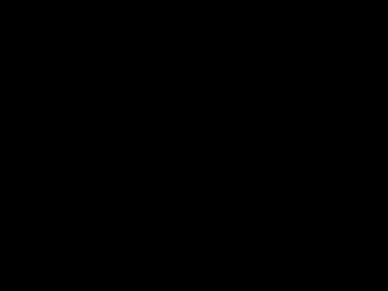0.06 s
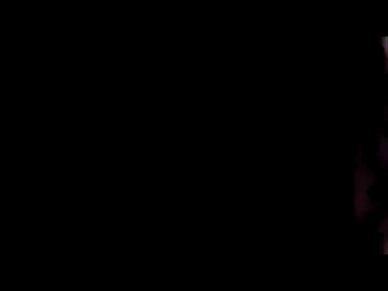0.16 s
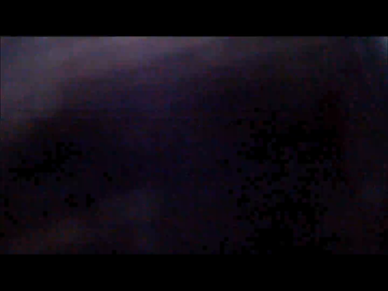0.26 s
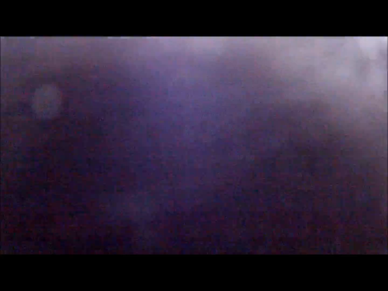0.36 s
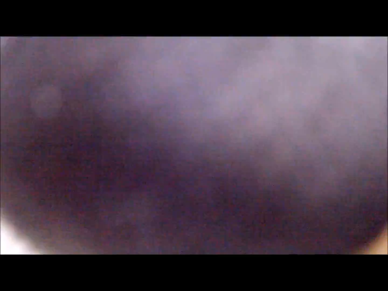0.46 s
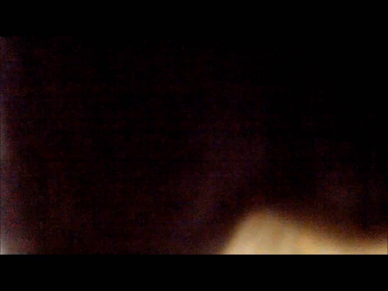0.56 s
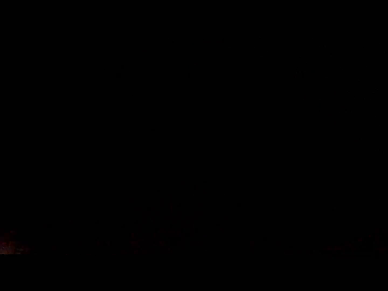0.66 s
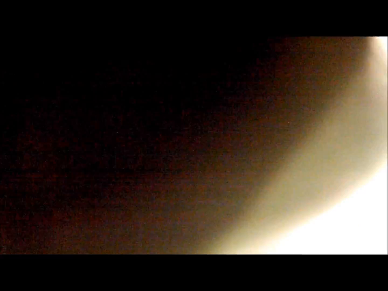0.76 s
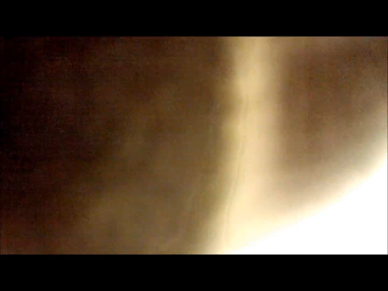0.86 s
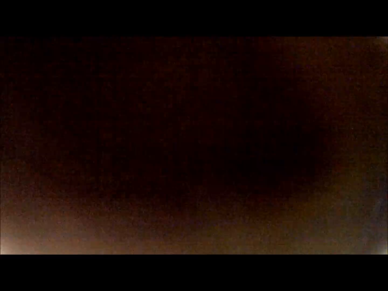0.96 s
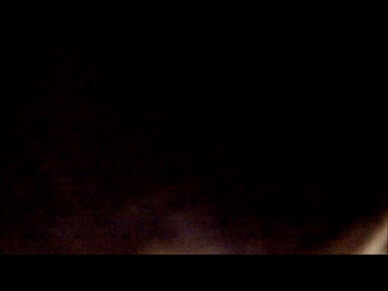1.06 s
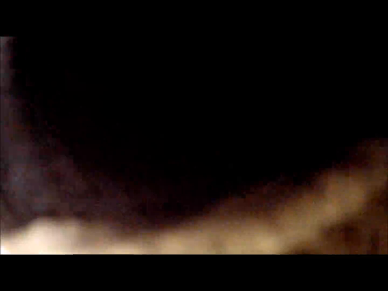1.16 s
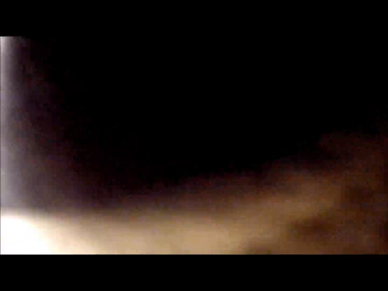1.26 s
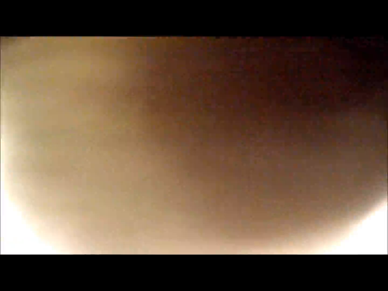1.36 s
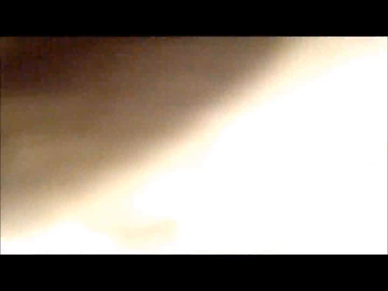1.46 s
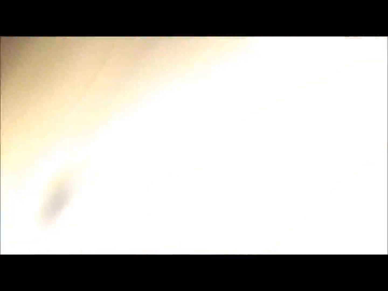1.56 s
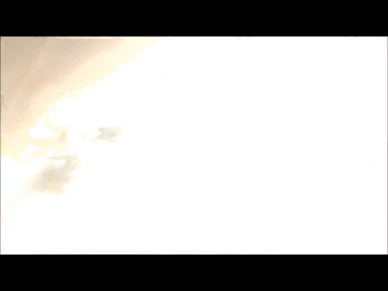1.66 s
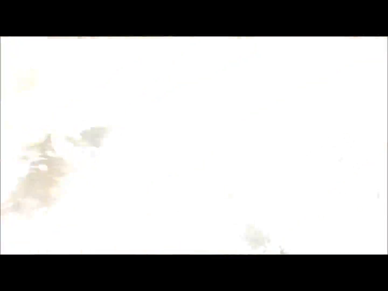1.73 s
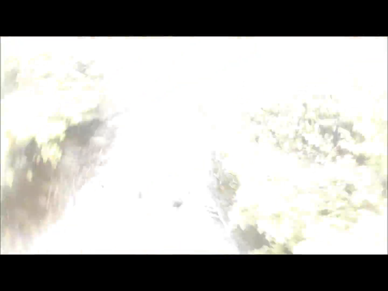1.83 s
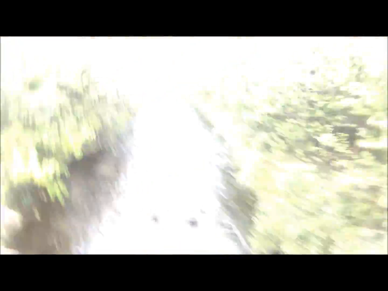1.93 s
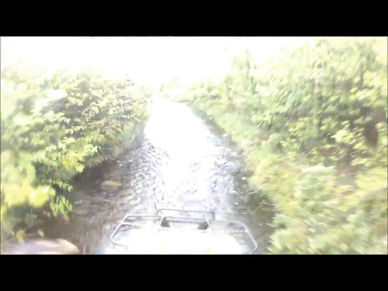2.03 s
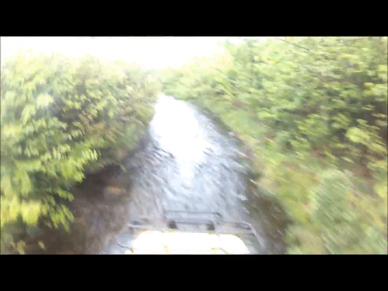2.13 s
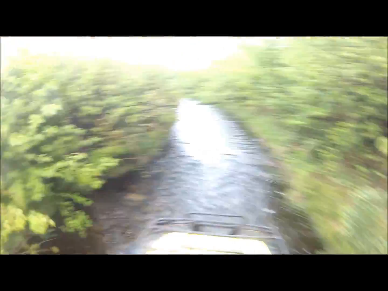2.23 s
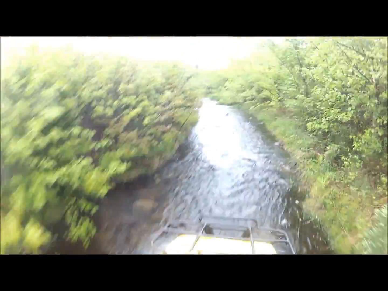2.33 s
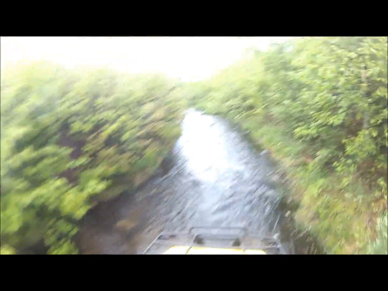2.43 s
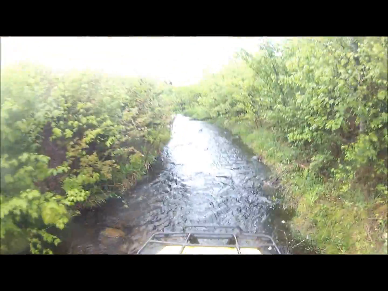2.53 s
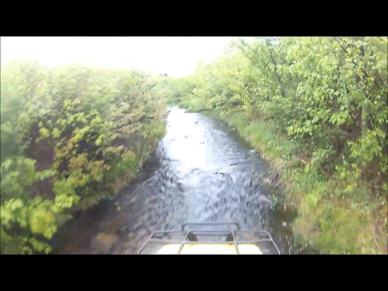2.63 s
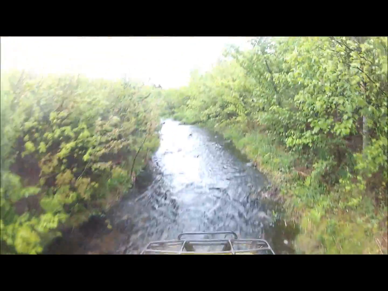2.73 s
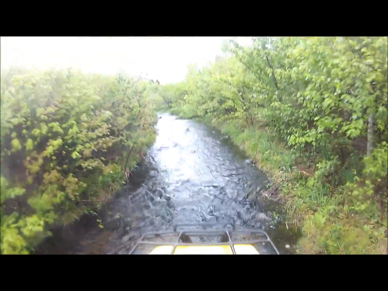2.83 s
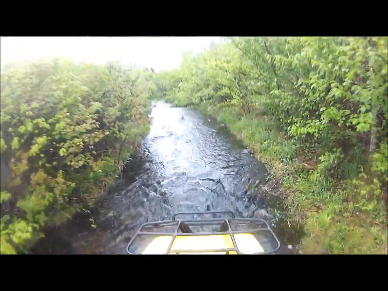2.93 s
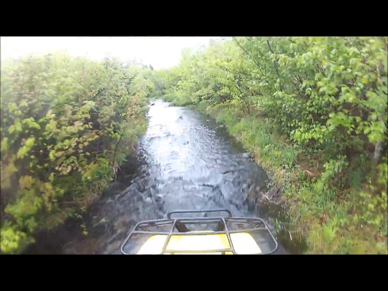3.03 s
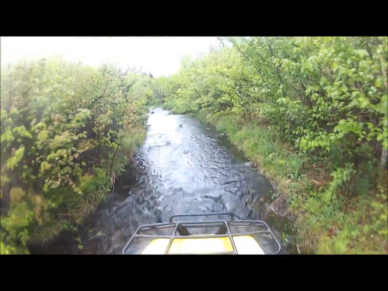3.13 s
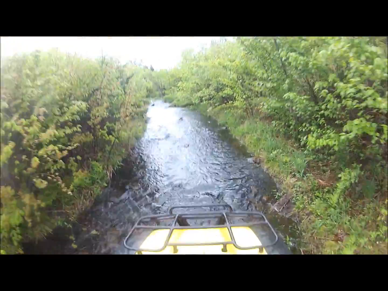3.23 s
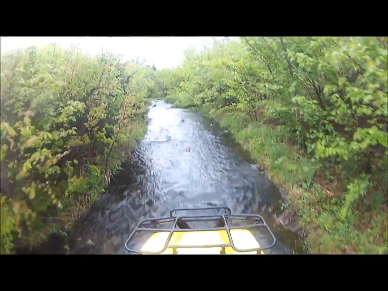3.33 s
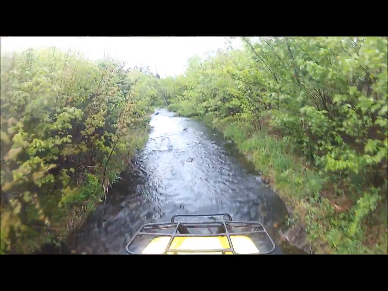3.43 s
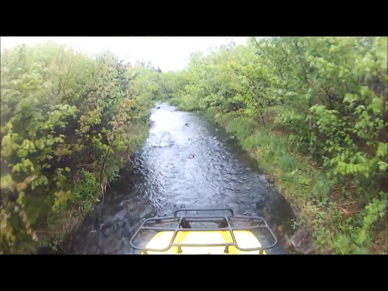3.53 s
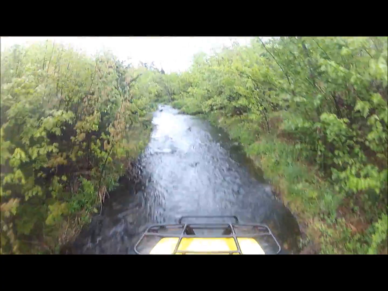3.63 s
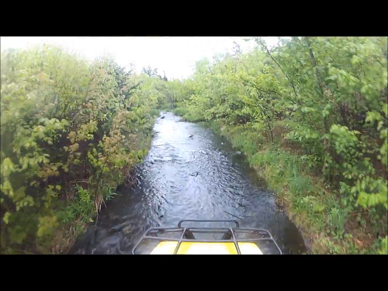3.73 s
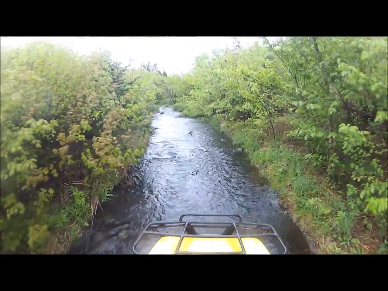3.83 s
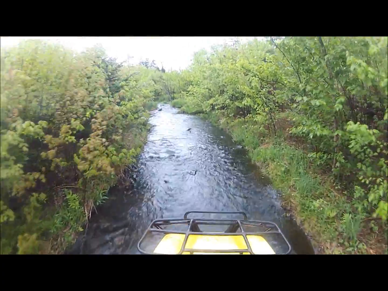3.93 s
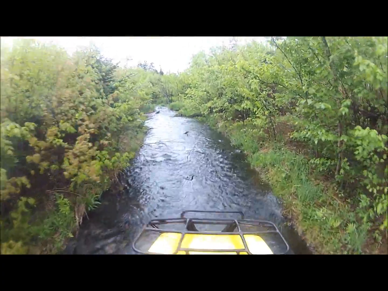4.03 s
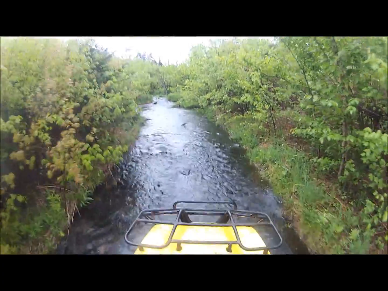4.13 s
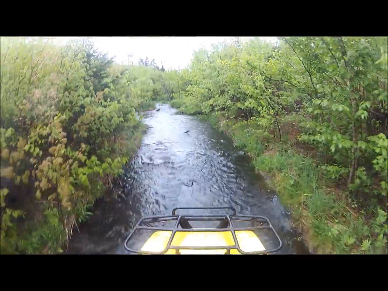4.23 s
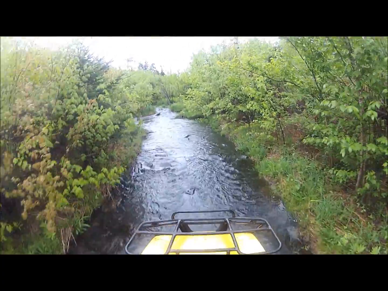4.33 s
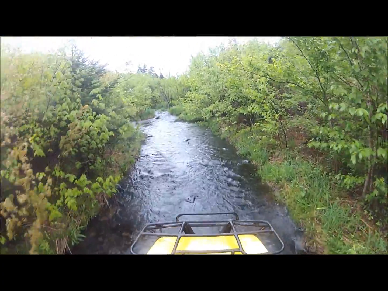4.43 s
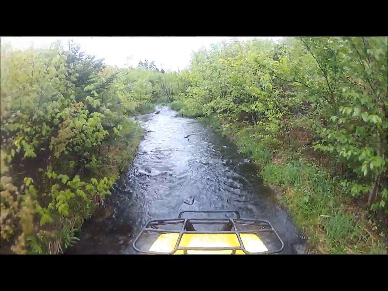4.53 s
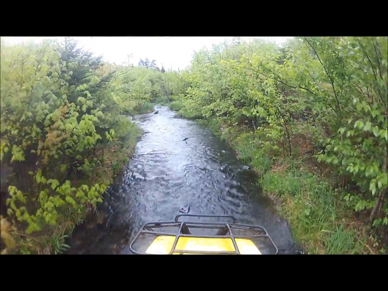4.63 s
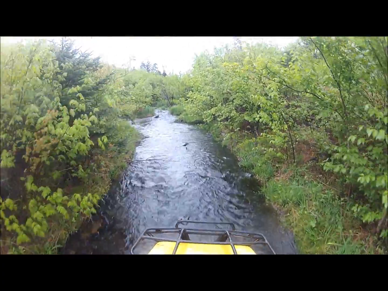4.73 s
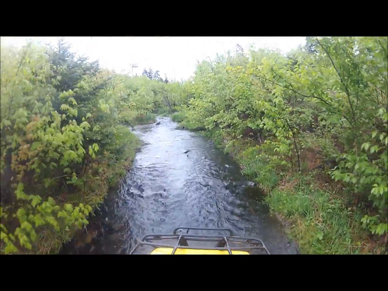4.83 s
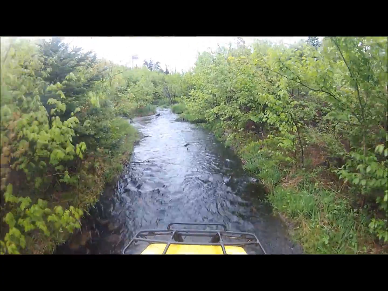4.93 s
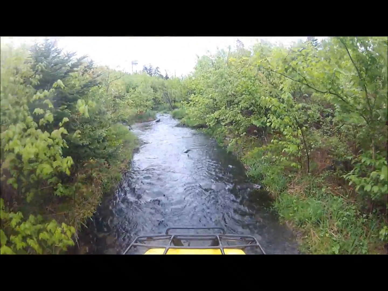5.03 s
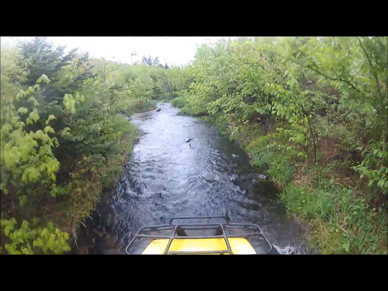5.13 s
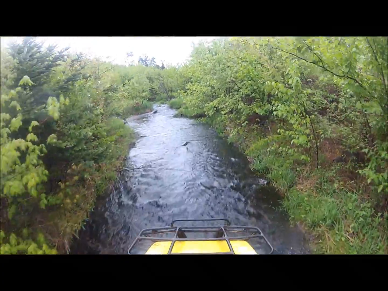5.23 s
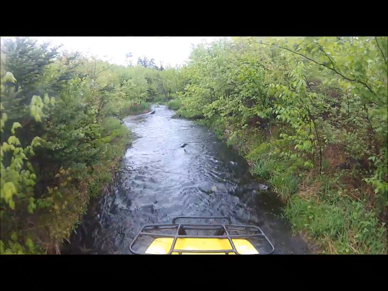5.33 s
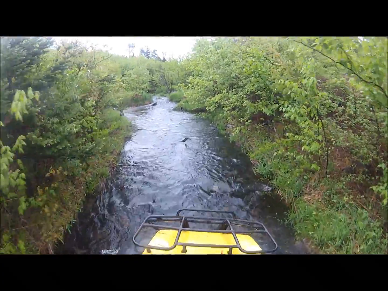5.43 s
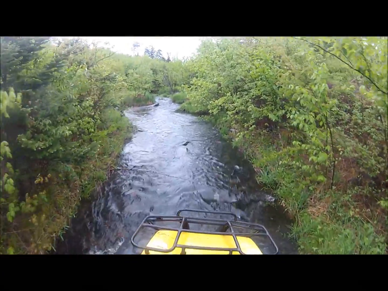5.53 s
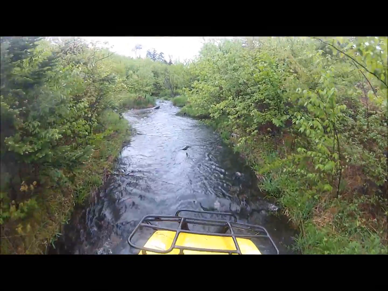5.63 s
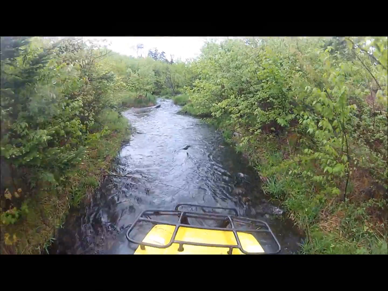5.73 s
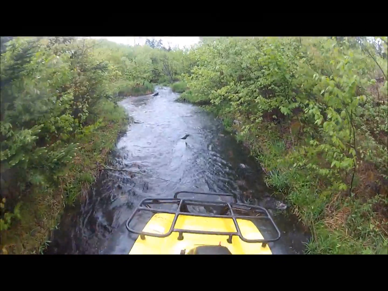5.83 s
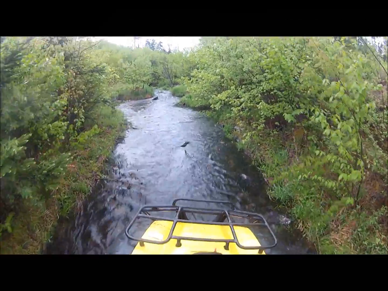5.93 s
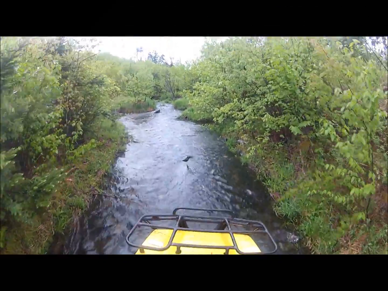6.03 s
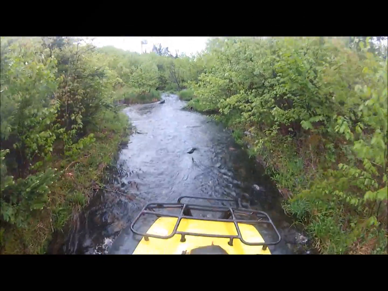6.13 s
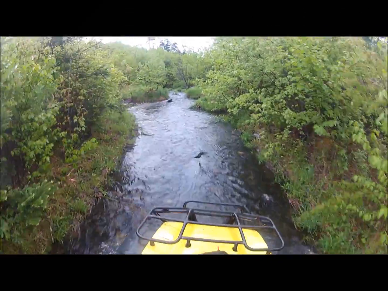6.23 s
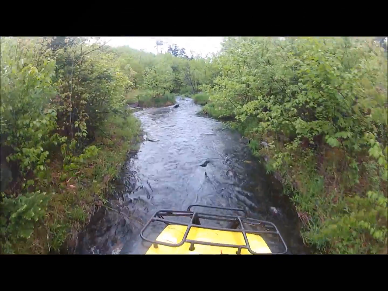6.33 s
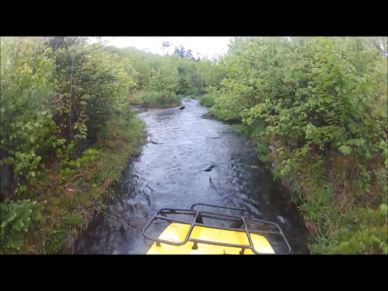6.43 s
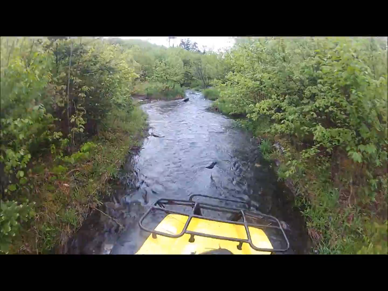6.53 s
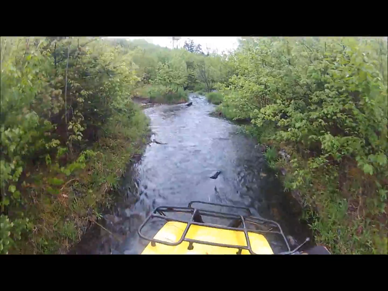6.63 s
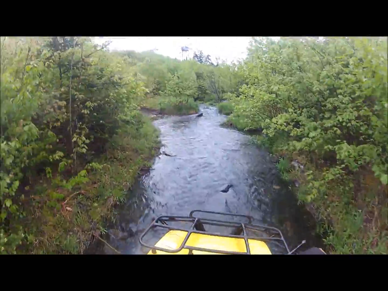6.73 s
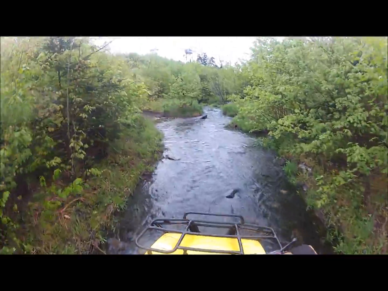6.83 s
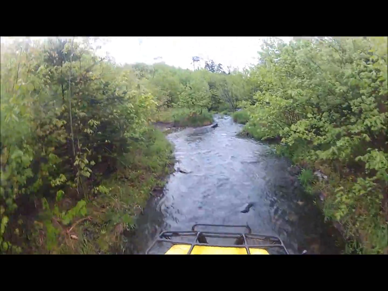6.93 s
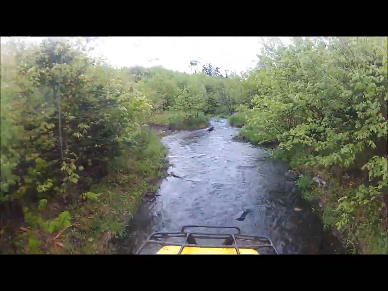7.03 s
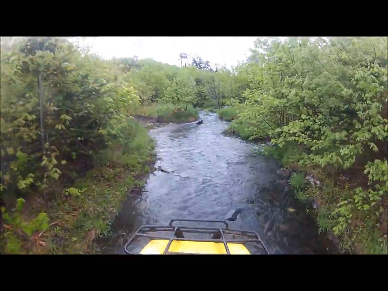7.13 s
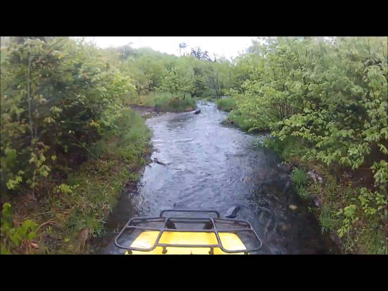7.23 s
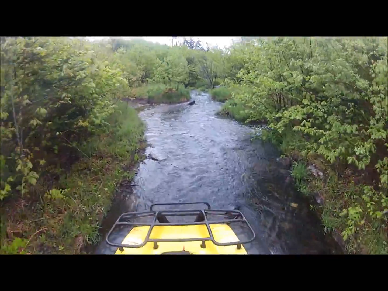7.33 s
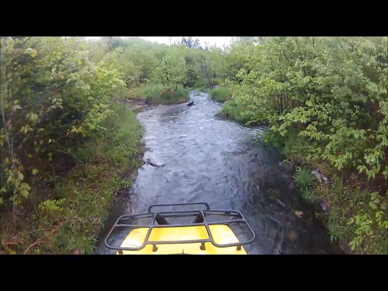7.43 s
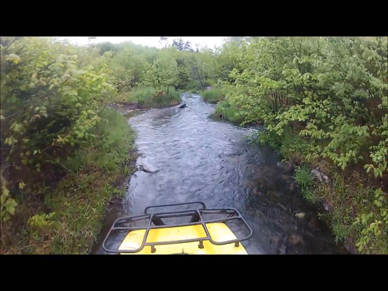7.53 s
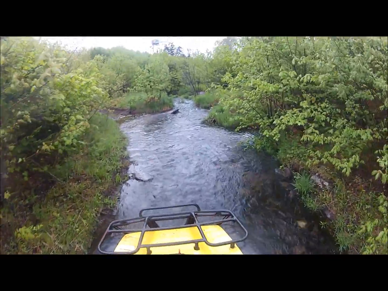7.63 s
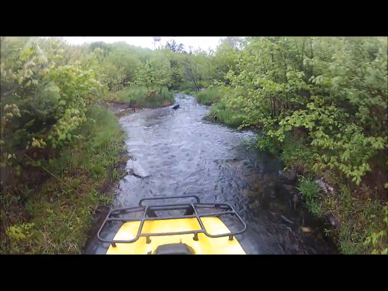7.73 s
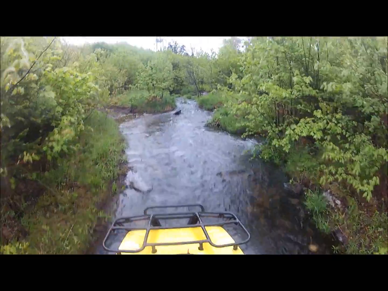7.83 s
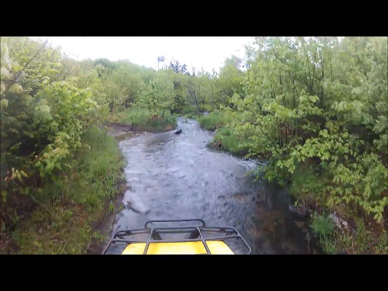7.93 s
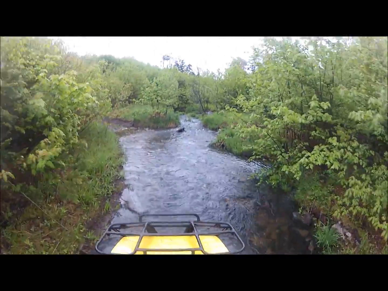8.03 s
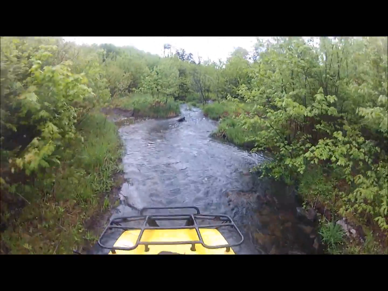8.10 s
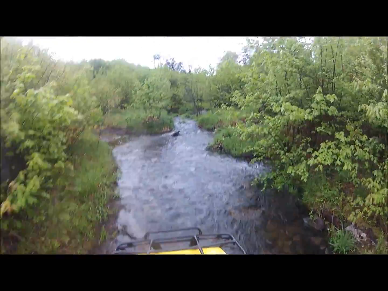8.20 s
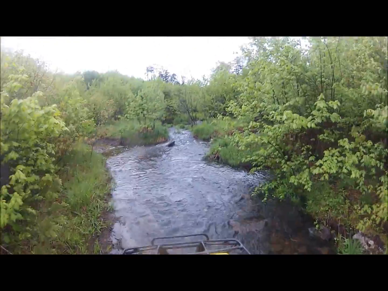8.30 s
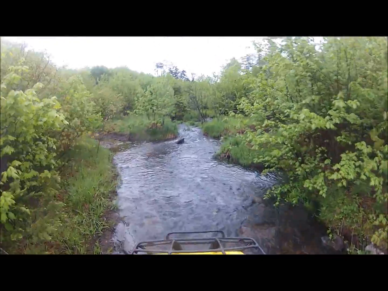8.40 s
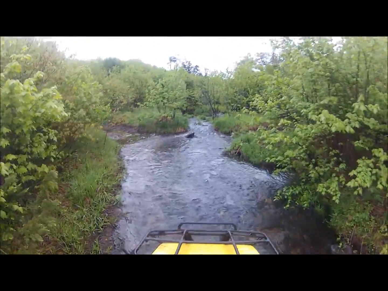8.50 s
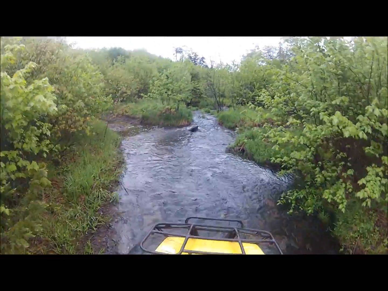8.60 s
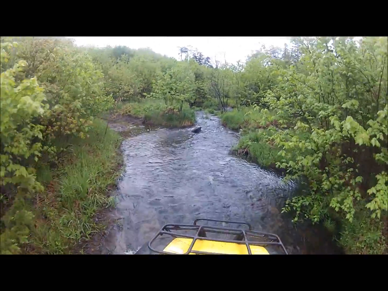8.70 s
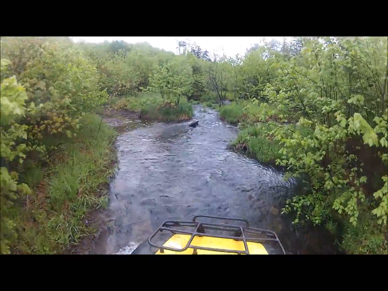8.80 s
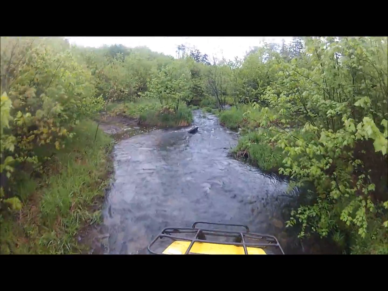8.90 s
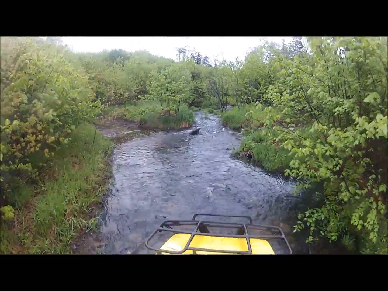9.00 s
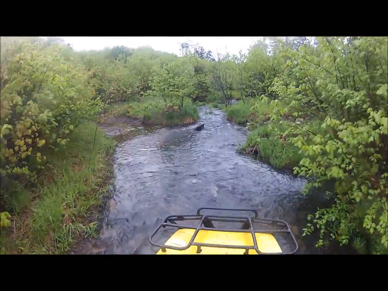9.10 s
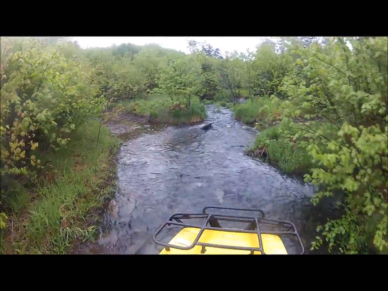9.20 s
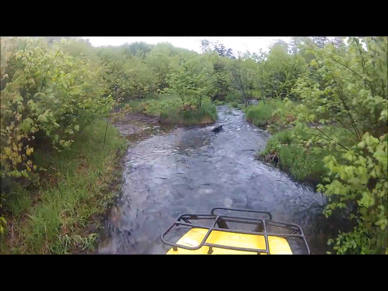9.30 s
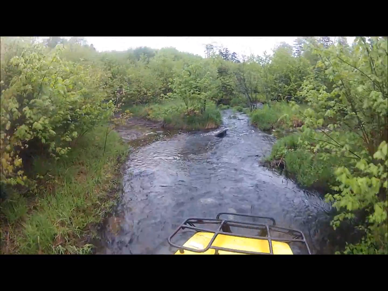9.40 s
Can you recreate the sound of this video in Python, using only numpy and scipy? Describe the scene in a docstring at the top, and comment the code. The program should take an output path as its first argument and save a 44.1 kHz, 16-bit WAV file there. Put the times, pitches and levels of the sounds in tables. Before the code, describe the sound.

Heard from a microphone in a plastic housing worn by the rider, a quad bike creeps through a shallow creek. Loud finger rubbing, bumps and low booms on the housing cover it at first, then stop abruptly. The single-cylinder engine putters on at low, slightly wavering revs, with a rush of belt and gears and faint churning water. One brief rattling clunk comes soon after the handling, a softer one near the end.

```python
"""A shallow creek: a quad bike chugs slowly up it, heard from a camera in a plastic case on the rider.
First a hand shifts the closed case: stick-slip friction makes it scrape and snap once, blows make it
knock and boom on its mount, and then it is let go. The single cylinder thuds on evenly, each exhaust
stroke ringing the pipe, under a steady rush of belt and gears and a little splashing.
Twice the wheels meet a stone. The resonances of the case colour the noises."""
import sys
import numpy as np
from scipy import signal
from scipy.fft import rfft, irfft
from scipy.io import wavfile
from scipy.ndimage import uniform_filter1d

SR = 44100
rng = np.random.default_rng(int(sys.argv[2]) if len(sys.argv) > 2 else 0)


def file_out(sig):
    """Save sig as 16-bit WAV at sys.argv[1]."""
    # one column per channel
    cols = np.atleast_2d(sig).T
    # limit, then scale
    lim = np.clip(cols, -1, 1)
    pcm = np.round(lim * 32767).astype(np.int16)
    wavfile.write(sys.argv[1], SR, pcm)


N = 417186
T = np.arange(N) / SR
CRUISE_HZ = 26  # reference firing rate
MOUNT_HZ, MOUNT_T60_S = 73.24, 0.34  # natural mode of the case on its mount


def undb(db):
    """Amplitude ratio of a level in decibels."""
    return 10 ** (np.asarray(db) / 20)

def unit(x):
    """Normalisation to an rms of one."""
    return x / np.sqrt(np.mean(x ** 2))

def walk(rate):
    """Low-pass noise: a smooth random wander with an rms of one."""
    size = int(SR / rate)
    held = np.repeat(rng.standard_normal(N // size + 1), size)[:N]
    return unit(uniform_filter1d(held, size))

def grains(rate, spread_db):
    """Shot noise: clicks of random size at random moments."""
    sizes = undb(spread_db * np.minimum(rng.exponential(size=N), 4))
    return unit((rng.random(N) < rate / SR) * sizes * rng.standard_normal(N))

def ring(x, hz, width_hz):
    """Second-order resonance with unit gain at its centre."""
    return signal.lfilter(*signal.iirpeak(hz, hz / width_hz, fs=SR), x)

def fade(s, decay_s):
    """Exponential decay from a sudden onset at time s."""
    return np.pad(np.exp(-T[:SR // 5] / decay_s), (int(s * SR), N))[:N]

def swing(s, hz, t60):
    """Damped oscillation that starts at time s and builds up within its first cycle."""
    age = T[:SR // 2]
    envelope = (1 - np.exp(-4 * hz * age)) * np.exp(-np.log(1000) * age / t60)
    return np.pad(envelope * np.sin(2 * np.pi * hz * age), (int(s * SR), N))[:N]

# Resonances of the camera case: f/Hz, bandwidth/Hz, gain/dB
CASE_MODES = [(668.6, 100, 8), (1100, 470, 1), (1980, 510, 4.5), (2367, 410, 8.5), (3380, 625, 9),
              (8480, 440, 10), (9890, 980, 15.5), (14150, 2100, 18.6), (15284, 417, 2)]
def through_case(x, spectrum, size=16384):
    """Source-filter model: the case's resonances add to a source spectrum (f/Hz, level/dB)."""
    f = np.maximum(np.fft.rfftfreq(size, 1 / SR), 1)
    hz, db = np.transpose(spectrum)
    source_db = np.interp(np.log(f), np.log(hz), db)
    case_db = sum(peak / (1 + (2 * (f - centre) / width) ** 2) for centre, width, peak in CASE_MODES)
    # folding the cepstrum gives a causal, minimum-phase response
    cepstrum = irfft(np.log(undb(source_db + case_db)))
    cepstrum[1:size // 2] *= 2
    cepstrum[size // 2 + 1:] = 0
    return signal.fftconvolve(x, irfft(np.exp(rfft(cepstrum))))[:len(x)]

def creek(splash_db=-57, surge_db=1.6):
    """Shot noise of droplets: the tyres churn the water in surges."""
    spectrum = [(150, -41), (700, 0.5), (1600, 0.5), (4000, -15.5), (6000, -22), (15000, -24)]
    drops = grains(rate=700, spread_db=0.5) * undb(surge_db * walk(6.5))
    return undb(splash_db) * unit(through_case(drops, spectrum))

# Spectrum of a jolt's rattle: f/Hz, level/dB
RATTLE_SPECTRUM = [(60, -22), (200, -9), (330, 0), (600, -4), (1100, -4), (1900, -25), (4000, -38),
                   (8500, -48), (12000, -33), (15000, -58)]
# Stones under the wheels: t/s, jolt level/dB, clunk f/Hz
STONES = [(2.186, -29, 770), (7.777, -35.5, 260)]
def jolts(rattle_s=0.008, clunk_db=6, t60_cycles=12.0, boom_db=-7):
    """Shock excitation: each stone sets off a brief rattle, a dull clunk and a swing of the mount."""
    rattle = unit(through_case(rng.standard_normal(N), RATTLE_SPECTRUM))
    bumps = np.zeros(N)
    for s, db, hz in STONES:
        clunk = undb(clunk_db) * swing(s, hz, t60_cycles / hz)
        boom = undb(boom_db) * swing(s, MOUNT_HZ, MOUNT_T60_S)
        bumps += undb(db) * (rattle * fade(s, rattle_s) + clunk + boom)
    return bumps

def gear(cycles, order=12, rough_rad=0.9, gearbox_hz=330, width_hz=44, resonant_db=-59):
    """Forced resonance: a rough gear tone follows the revs and swells near the gearbox's mode."""
    tone = np.sqrt(2) * np.sin(2 * np.pi * order * cycles + rough_rad * walk(40)) * undb(2 * walk(30))
    return undb(resonant_db) * ring(ring(tone, gearbox_hz, width_hz), gearbox_hz, width_hz)

# Spectrum of valve gear, belt and gears: f/Hz, level/dB
RUSH_SPECTRUM = [(20, -12), (60, -10), (200, -3.5), (450, -9.5), (900, -7.5), (1350, -6.5), (1800, -1.5),
                 (2850, -18), (4300, -14.5), (6000, -27), (7200, -20), (11500, -31), (15200, -40)]
# Modes of the drive cover: f/Hz, nominal bandwidth/Hz, relative level/dB
COVER_MODES = [(906, 46, -21), (1762, 72, -13), (3285, 65, -22.5), (3566, 40, -28), (4170, 44, -31),
               (4780, 73, -26.5), (8620, 87, -34), (10130, 95, -18), (13780, 110, -22.5)]
def machinery(cycles, throb=0.083, tick_db=-7, waver_db=1.0):
    """Amplitude modulation: the rush and ticks of the drive swell each crank turn and ring its cover."""
    swell = 1 + throb * np.cos(2 * np.pi * 2 * cycles)  # two crank turns per firing
    drive = swell * (rng.standard_normal(N) + undb(tick_db) * grains(rate=700, spread_db=2.0))
    rush = unit(through_case(drive, RUSH_SPECTRUM))
    cover = sum(undb(db + 2 * walk(4)) * unit(ring(ring(drive, hz, 2 * width), hz, 2 * width))
                for hz, width, db in COVER_MODES)
    return (rush + cover) * undb(waver_db * walk(12))

# Modes of the exhaust pipe at the reference firing rate: f/Hz, relative level/dB
PIPE_MODES = [(55, -12), (134, -1), (208, -18.5), (315, -17), (365, -25.5)]
# Spectrum of gas fluttering in the silencer: f/Hz, level/dB
FLUTTER_SPECTRUM = [(20, -9), (55, -3), (90, -1.5), (135, -6), (190, -0.5), (250, -4.5), (320, 0.5),
                    (400, -1), (520, -15.5), (1500, -60)]
def exhaust(cycles, hz, open_share=0.825, scatter_db=0.73, vary_db=0.96, flutter_db=-15, quicken=0.7):
    """Pulsed pipe resonance: each stroke is a rounded thud, then a lull; the gas flutters throughout."""
    phase = cycles % 1
    flow = np.sin(np.pi * np.minimum(phase / open_share, 1)) ** 0.64
    age = phase / hz * (hz / CRUISE_HZ) ** quicken  # the swings come quicker at higher revs
    swings = sum(undb(db + vary_db * walk(18)) * np.sin(2 * np.pi * pipe_hz * age)
                 for pipe_hz, db in PIPE_MODES)
    flutter = unit(through_case(rng.standard_normal(N), FLUTTER_SPECTRUM))
    thuds = unit(flow * swings) * undb(scatter_db * walk(3.015))
    return thuds + undb(flutter_db) * flutter

# The rider's throttle: t/s, firing f/Hz, exhaust level/dB
THROTTLE = [(2.1, 27.7, -45.5), (2.42, 29.1, -42.3), (3.1, 28.3, -42.5), (3.6, 25.8, -41.9),
            (4.08, 25, -42.5), (4.29, 25.6, -41), (4.58, 23.6, -44.5), (5.15, 25, -44), (5.42, 25.2, -44),
            (5.65, 26.2, -41.8), (6.92, 25, -43.2), (7.65, 25.8, -44), (7.92, 28.3, -41.5),
            (8.17, 26.4, -44), (8.54, 29, -45.3), (8.85, 27.3, -47.3), (9.1, 29.8, -42),
            (9.46, 26.9, -43.3)]
def quad_bike(rush_db=-47.5, rush_db_per_hz=0.6, speed_jitter=0.00498):
    """Phase locking: one crank times exhaust, machinery and gear; the rush grows with the revs."""
    times, rates, levels = np.transpose(THROTTLE)
    hz = np.interp(T, times, rates)
    exhaust_gain = undb(np.interp(T, times, levels))
    rush_gain = undb(rush_db + rush_db_per_hz * (hz - CRUISE_HZ))
    cycles = np.cumsum(hz * (1 + speed_jitter * walk(12))) / SR
    return exhaust(cycles, hz) * exhaust_gain + machinery(cycles) * rush_gain + gear(cycles)

# Strokes of the hand: t/s, duration/s, relative scrape level/dB, relative judder level/dB, swell/dB
HAND_STROKES = [(0.008, 0.052, -24.7, -19, -1), (0.07, 0.19, -39, -41, -12), (0.315, 0.09, -32.5, -25, -8),
                (0.465, 0.07, -31.3, -20, 3), (0.647, 0.151, -27.7, -21, -2), (0.91, 0.138, -29.7, -20, 4),
                (1.13, 0.03, -34, -34, 0), (1.303, 0.272, -32, -30, -7), (1.615, 0.05, -25.3, -22, 0),
                (1.681, 0.05, -18, -25, 7)]
def hand(attack_s=0.02, release_s=0.015, grip_scrape_db=-45, grip_judder_db=-39):
    """Power summation: strokes add to a light resting grip, giving the scrape and judder envelopes."""
    scrape, judder = undb(grip_scrape_db) ** 2, undb(grip_judder_db) ** 2
    for start, length, scrape_db, judder_db, swell_db in HAND_STROKES:
        age = T - start
        moving = np.exp(np.minimum(age, 0) / attack_s - np.maximum(age - length, 0) / release_s)
        swell = swell_db * (np.clip(age / length, 0, 1) - .5)
        scrape = scrape + (moving * undb(scrape_db + swell)) ** 2
        judder = judder + (moving * undb(judder_db)) ** 2
    return np.sqrt(scrape), np.sqrt(judder)

# Spectrum of fingers sliding over the case: f/Hz, level/dB
SCRAPE_SPECTRUM = [(150, -16), (450, -3), (900, -2.5), (1350, -2), (1800, -2), (2850, -8.5), (3600, -7),
                   (4500, -15), (6000, -18.5), (7200, -16.5), (11500, -23), (15200, -30.5)]
# Spectrum of the case juddering under them: f/Hz, level/dB
JUDDER_SPECTRUM = [(20, -13), (45, -11.5), (62, 2.5), (76, 4.5), (95, 2.5), (140, -1), (190, -7.5),
                   (235, -5.5), (280, -13.5), (380, -11), (500, -29), (1200, -57.5)]
# Narrow modes of the shell: f/Hz, relative level/dB
SHELL_MODES = [(678, 5), (1012, 2), (1147, 8), (1257, 4), (1523, -0.5), (1658, 6), (1850, -2), (2013, 9),
               (2120, 3), (2697, -3), (2830, -6)]
def rubbing(let_go_s=1.730, let_go_fade_s=0.004, creak_db=-2.3, width_hz=32, bite=0.46, gain_db=-2):
    """Stick-slip friction: fingers on the plastic hiss, ring the shell and shake the whole case."""
    pressure, judder = hand()
    touching = np.exp(-np.maximum(T - let_go_s, 0) / let_go_fade_s)
    slips = grains(rate=6000, spread_db=-1.0) * undb(walk(220))
    rings = unit(sum(undb(db) * ring(ring(slips, hz, width_hz), hz, hz / 2) for hz, db in SHELL_MODES))
    # the harder the fingers press, the more the hiss turns into a creak
    creak = undb(creak_db) * (pressure / pressure.max()) ** bite
    hiss = unit(through_case(slips, SCRAPE_SPECTRUM))
    scrape = (hiss + creak * rings) / np.hypot(1, creak)
    shake = through_case(grains(rate=900, spread_db=1.5), JUDDER_SPECTRUM)
    # the grip holds the shaking to an even size
    shake /= np.sqrt(uniform_filter1d(shake ** 2, size=1500) + 1e-12)
    return undb(gain_db) * touching * (scrape * pressure + shake * judder)

# The case slipping in its clamp: t/s, slip f/Hz, duration/s, level/dB
CLAMP_SLIP = (1.2452, 1740, 0.0027, -6)
# Spectrum of the snap: f/Hz, level/dB
SNAP_SPECTRUM = [(100, -2.5), (600, 4), (1150, 5), (1800, -2.5), (2700, -2.5), (3500, -8), (5200, -7.5),
                 (7000, -10.5), (8700, -13), (11500, -25), (15000, -31)]
def snap(jitter=.05):
    """Temporal fusion: a few stick-slip pulses come so close together that they make one bright snap."""
    start, slip_hz, length, db = CLAMP_SLIP
    slips = np.arange(start, start + length, 1 / slip_hz)
    slips = slips + jitter / slip_hz * np.interp(slips, T, rng.standard_normal(N))
    pulses = np.zeros(N)
    pulses[(SR * slips).astype(int)] = 1
    return undb(db) * unit(through_case(pulses, SNAP_SPECTRUM)) * np.sqrt(length * SR / N)

# Blows on the case: t/s, thud level/dB, thud f/Hz, crack level/dB
BLOWS = [(0.0302, 5, 135, -12.5), (0.0352, -2, 145, -18), (.036, -8.5, 1030, -30), (.063, -18, 157, -24),
         (.310, -13, 170, -33), (0.497, -20, 160, -28), (.536, -11, 158, -23), (.563, -16.5, 660, -38),
         (.730, -19, 168, -22), (.930, -11, 134, -28), (.988, -13, 230, -35), (1.175, -38, 200, -27),
         (1.2475, -19, 250, -24), (1.287, -43, 230, -20), (1.335, -10, 202, -25), (1.726, -24, 686, -14.5)]
# Spectrum of a blow's crack: f/Hz, level/dB
CRACK_SPECTRUM = [(150, -2), (600, -4.5), (1150, -3), (1900, 1.5), (2700, -8.5), (3400, -8.5), (4500, -15),
                  (6000, -21), (8500, -18), (11500, -22), (15000, -28)]
# Shoves that set the mount swinging: t/s, level/dB
MOUNT_SHOVES = [(0.041, -16), (0.14, -26), (.366, -15), (0.492, -8.5), (.537, -13.5), (.795, -20.5),
                (0.899, -21), (1.340, -18), (1.465, -16), (1.575, -22), (1.6803, -4.5), (1.7161, -3)]
def knocks(t60_cycles=10.5, crack_s=0.0028):
    """Free vibration after impact: blows thud and crack in the shell; shoves leave the mount booming."""
    thuds = sum(undb(db) * swing(s, hz, t60_cycles / hz) for s, db, hz, _ in BLOWS)
    crack_envelope = sum(undb(db) * fade(s, crack_s) for s, _, _, db in BLOWS)
    shell_noise = unit(through_case(rng.standard_normal(N), CRACK_SPECTRUM))
    boom = sum(undb(db) * swing(s, MOUNT_HZ, MOUNT_T60_S) for s, db in MOUNT_SHOVES)
    return thuds + crack_envelope * shell_noise + boom

def scene():
    """Superposition: engine and creek run throughout, under the handling at the start."""
    return (quad_bike() + creek() + jolts() + rubbing() + knocks() + snap())[None]

def record(dry):
    """Saturation and band limiting: the camera flattens the hardest knocks and cuts the top."""
    low_pass = signal.ellip(10, .2, 80, 15400, fs=SR, output="sos")
    return signal.sosfilt(low_pass, np.clip(dry, -1, 1))


dry = scene()
out = record(dry)
file_out(out)
```